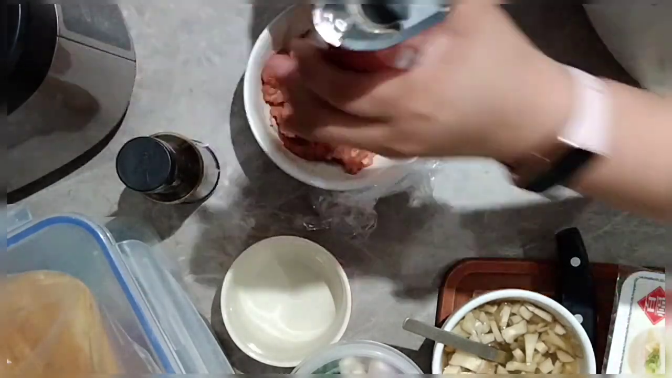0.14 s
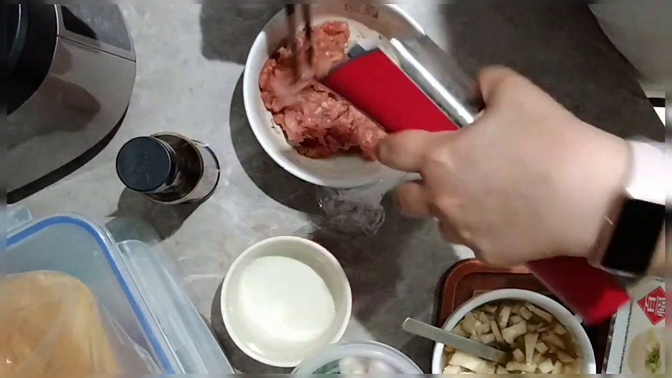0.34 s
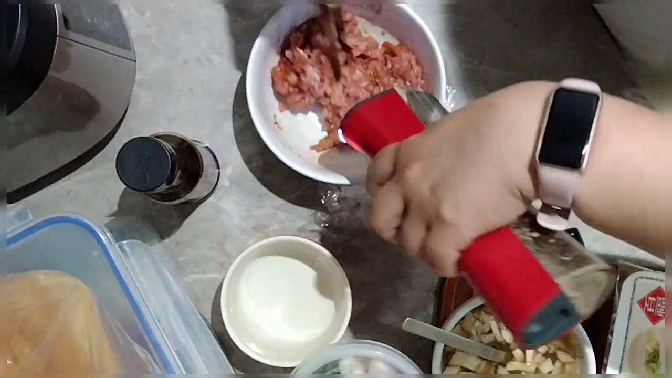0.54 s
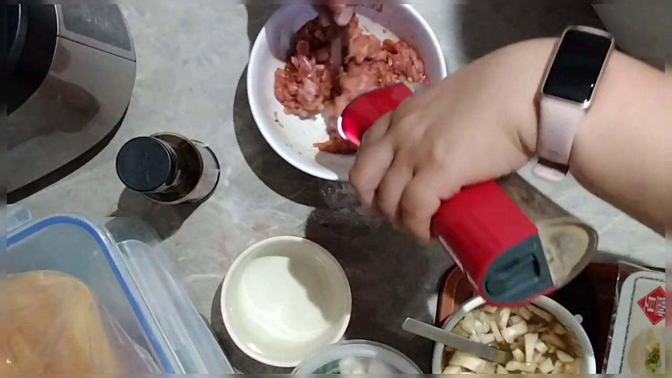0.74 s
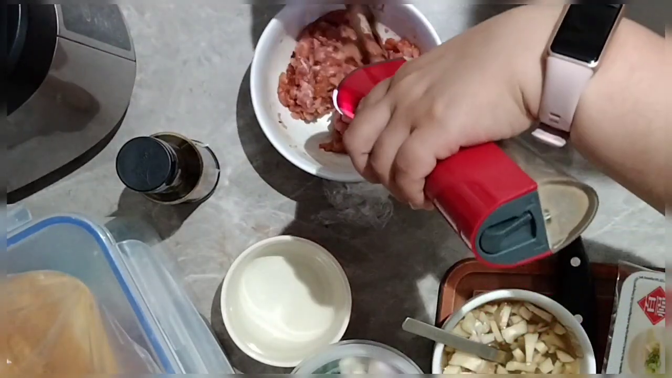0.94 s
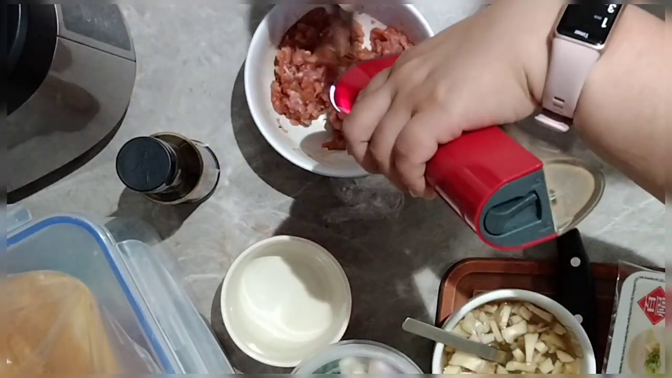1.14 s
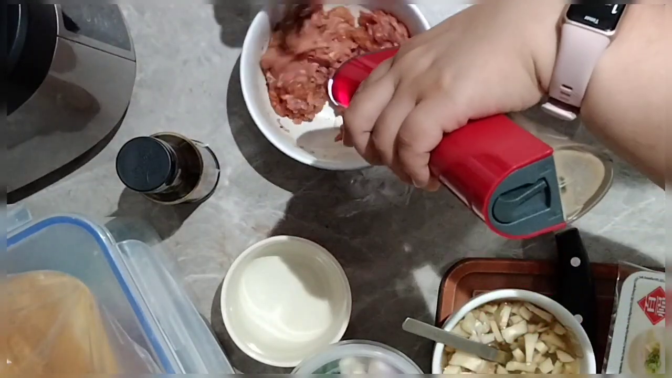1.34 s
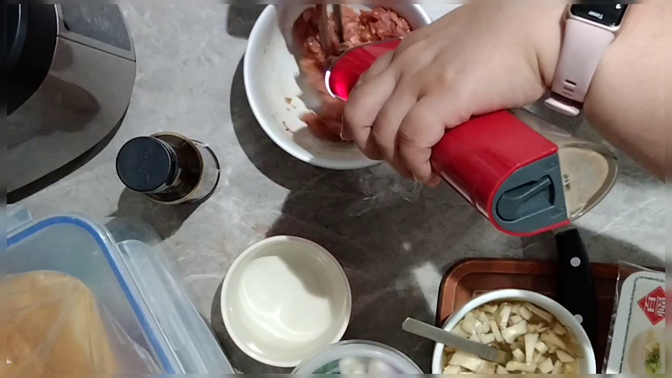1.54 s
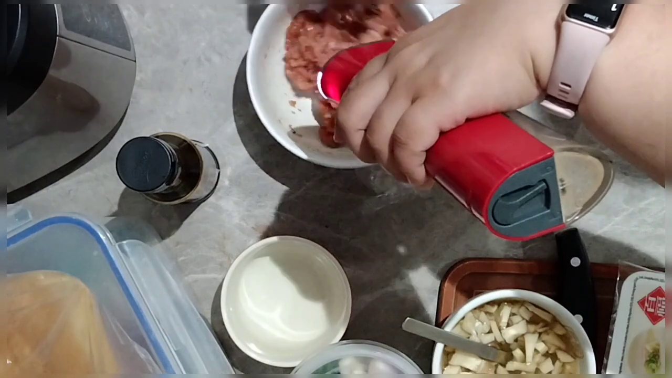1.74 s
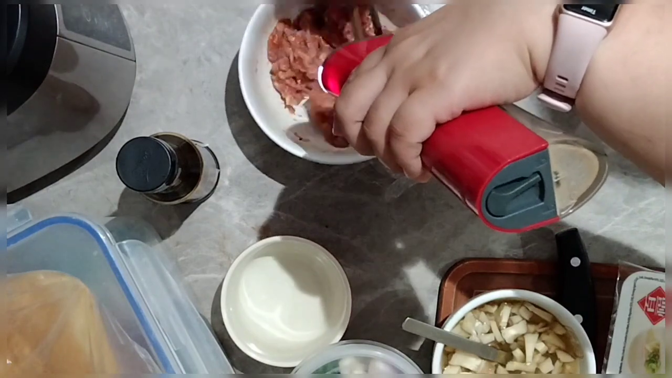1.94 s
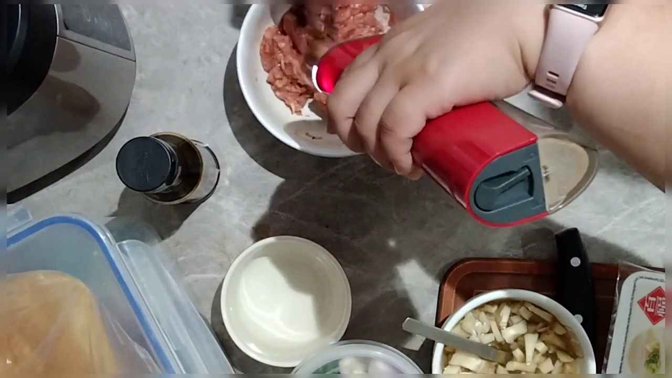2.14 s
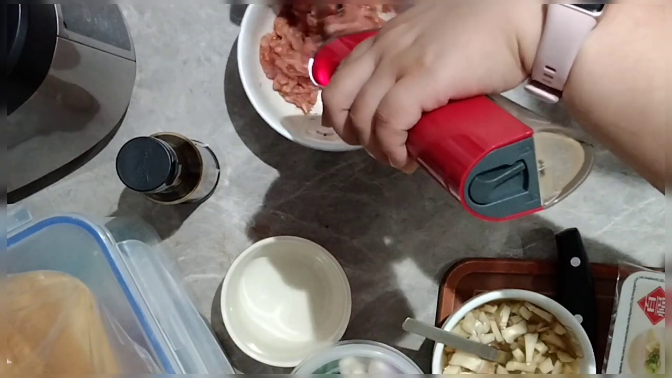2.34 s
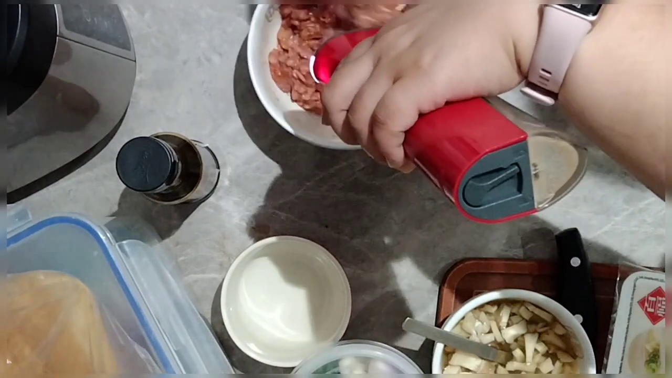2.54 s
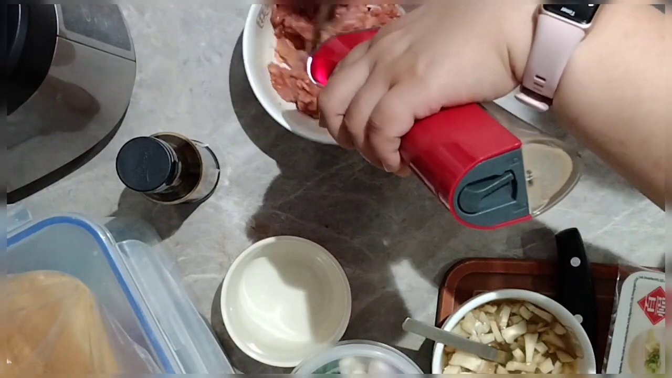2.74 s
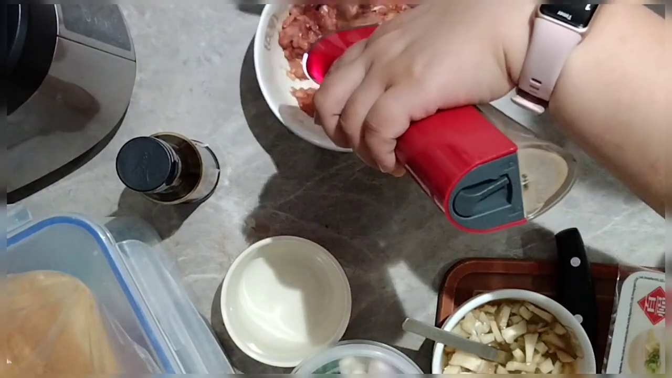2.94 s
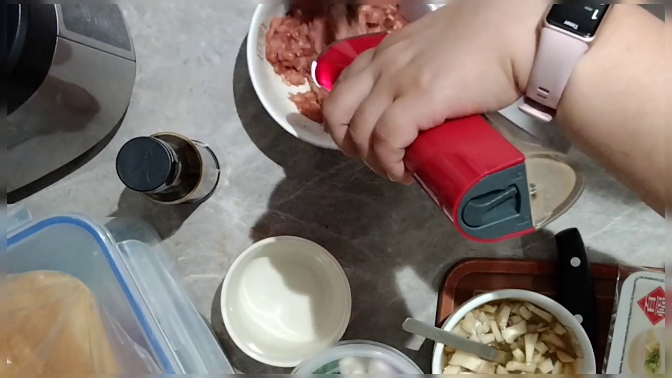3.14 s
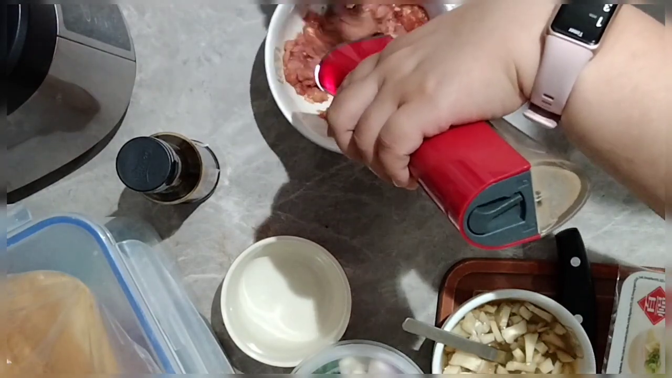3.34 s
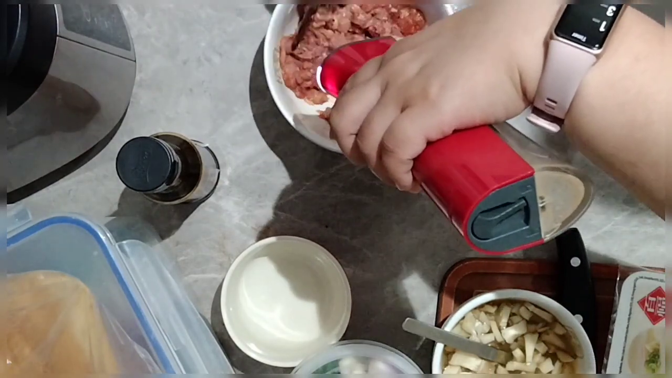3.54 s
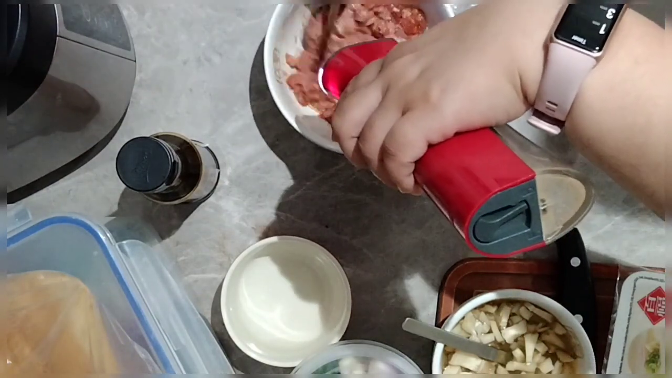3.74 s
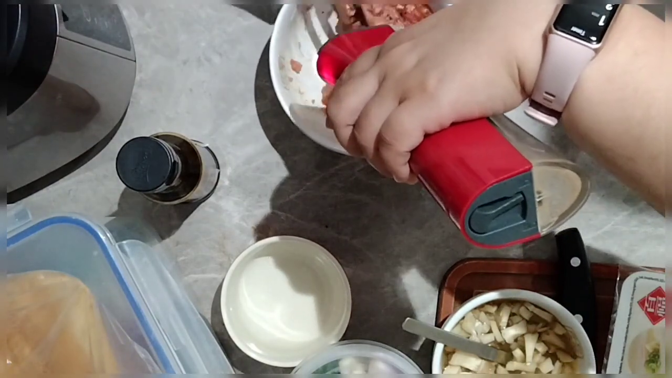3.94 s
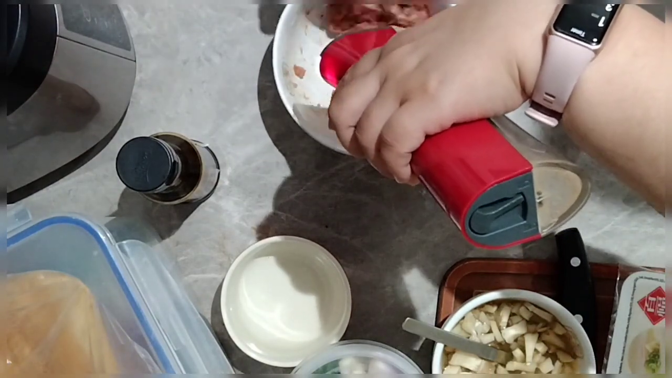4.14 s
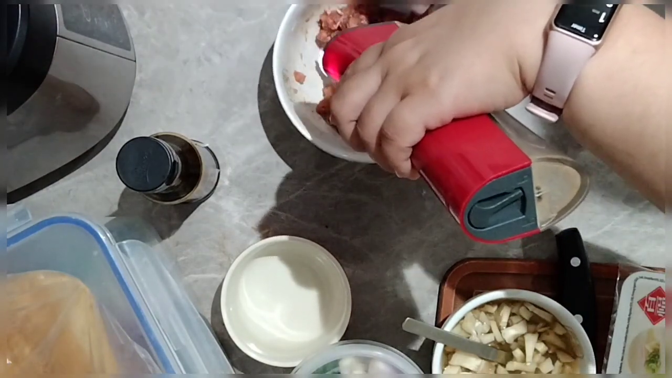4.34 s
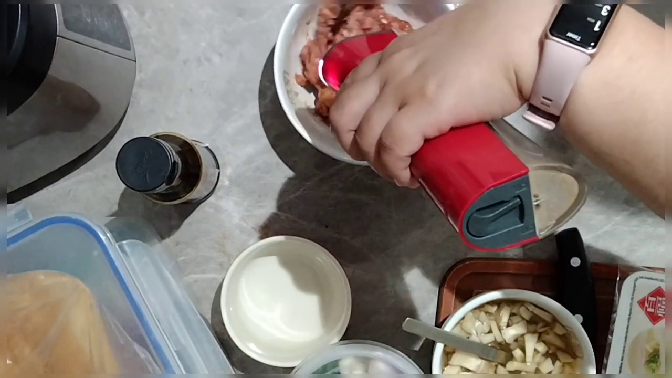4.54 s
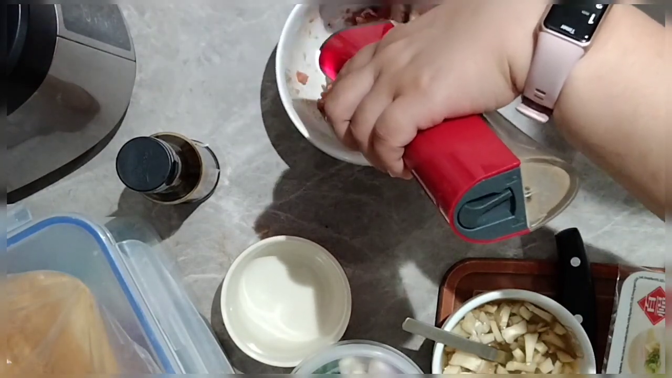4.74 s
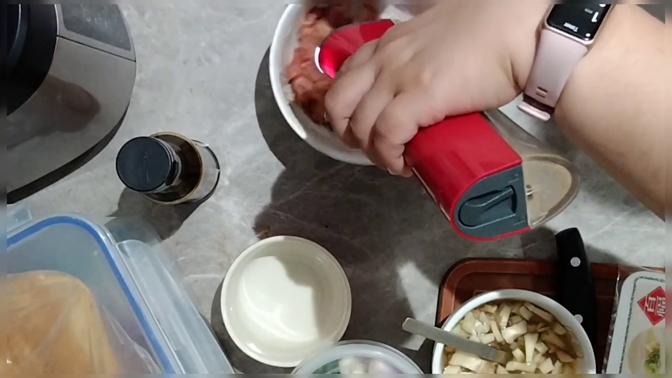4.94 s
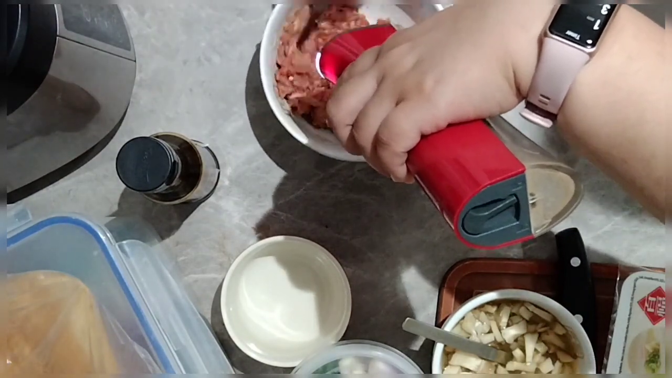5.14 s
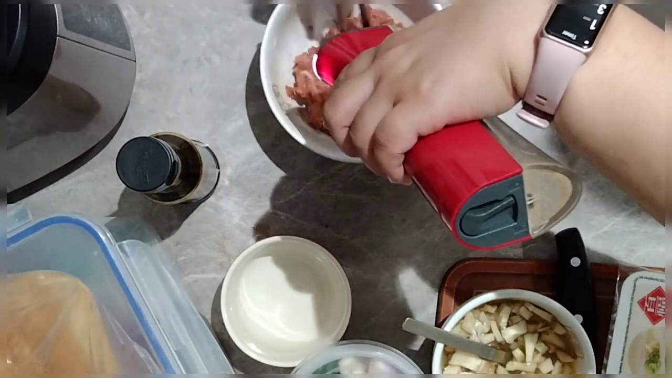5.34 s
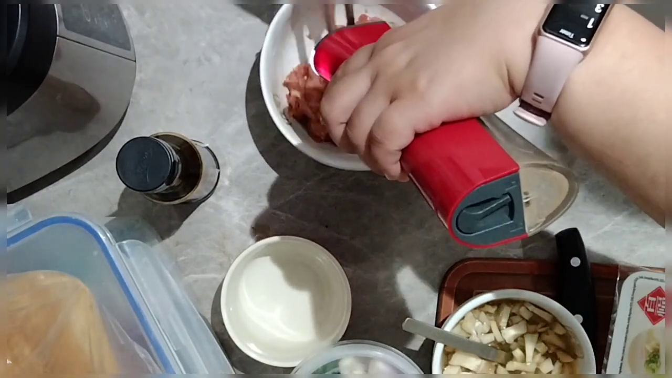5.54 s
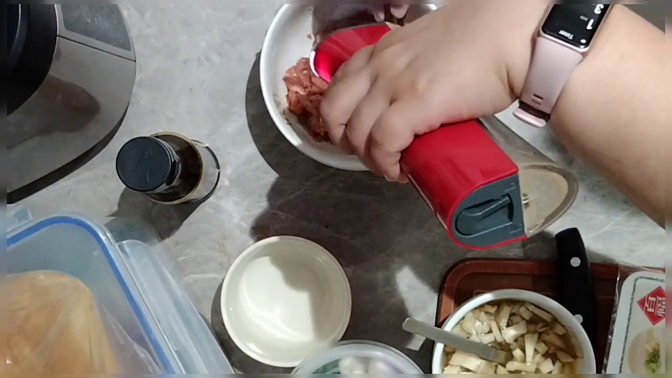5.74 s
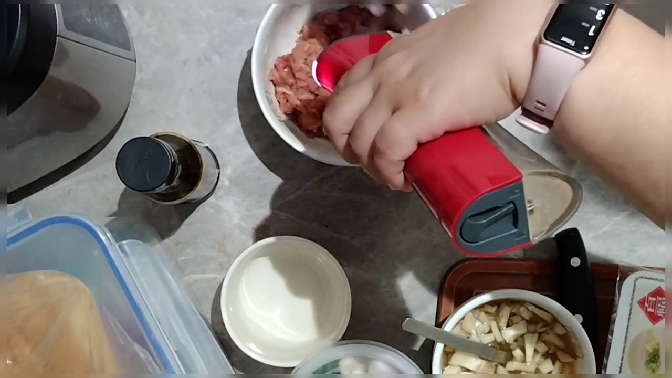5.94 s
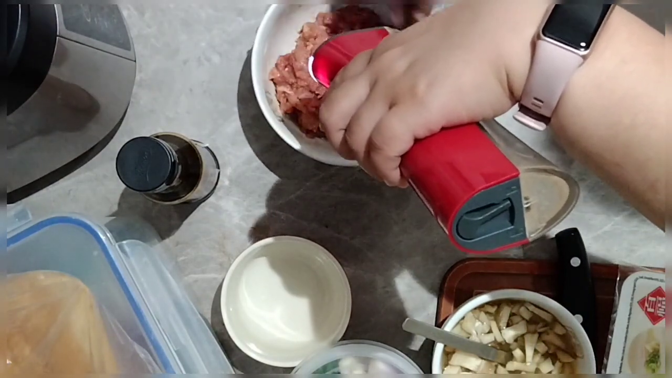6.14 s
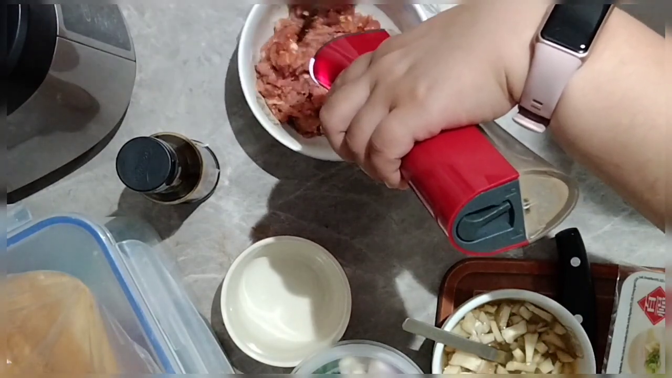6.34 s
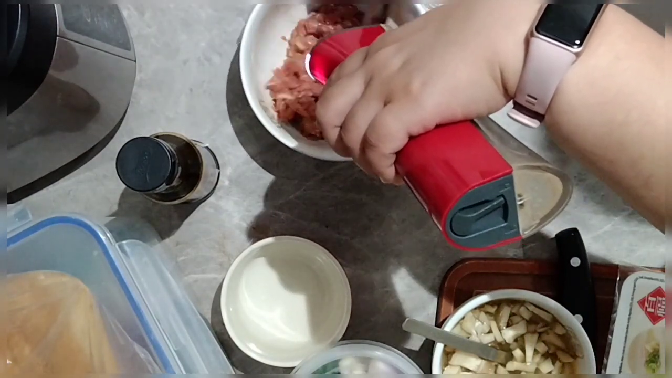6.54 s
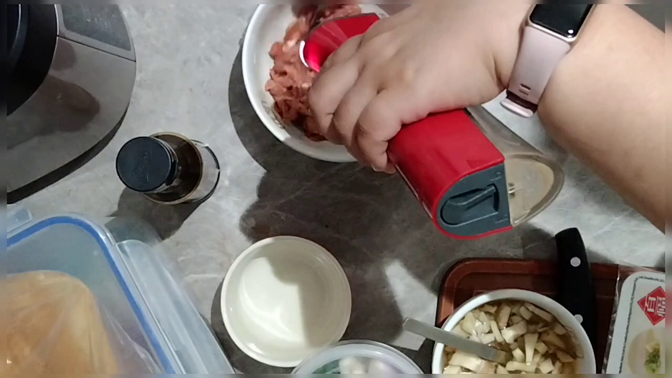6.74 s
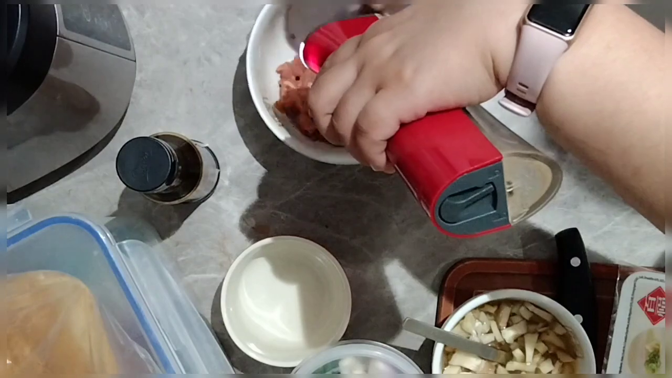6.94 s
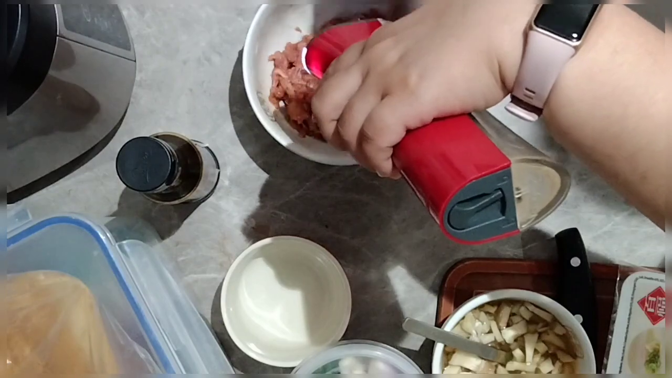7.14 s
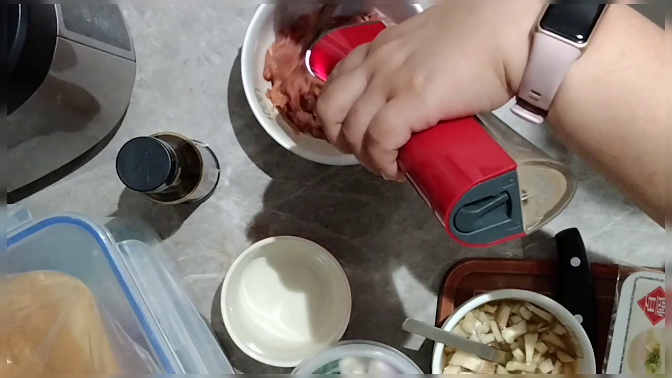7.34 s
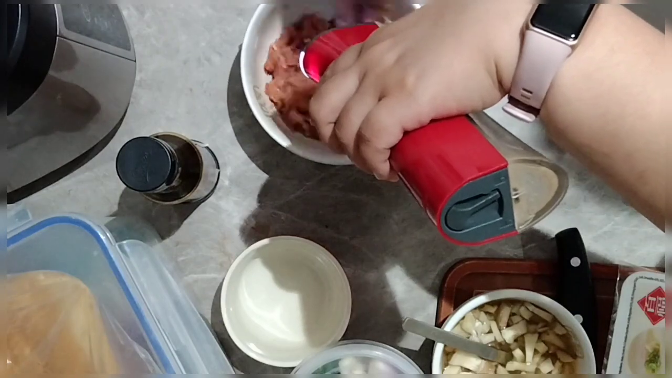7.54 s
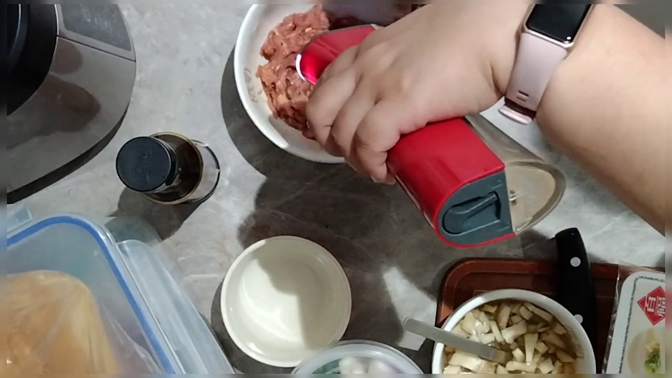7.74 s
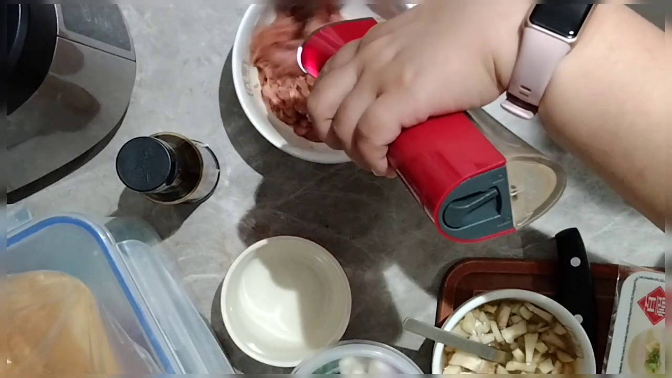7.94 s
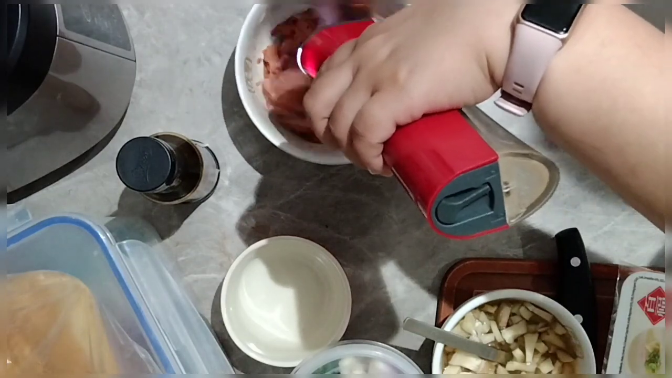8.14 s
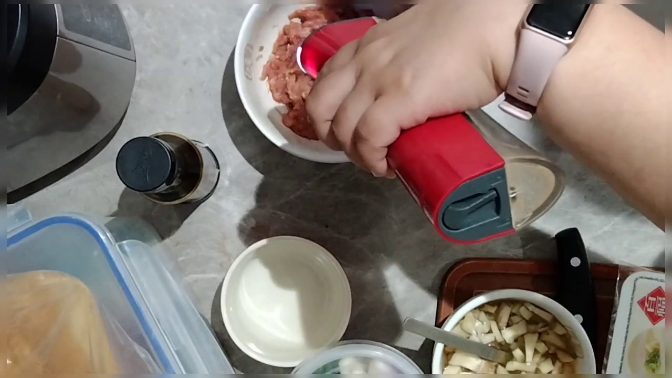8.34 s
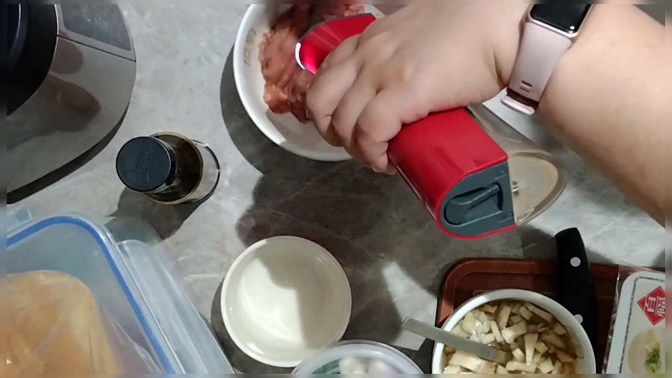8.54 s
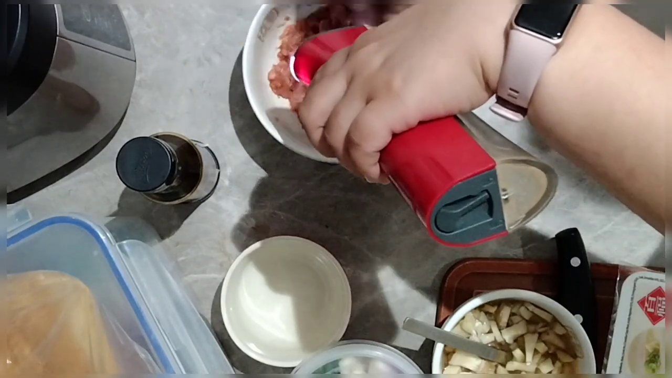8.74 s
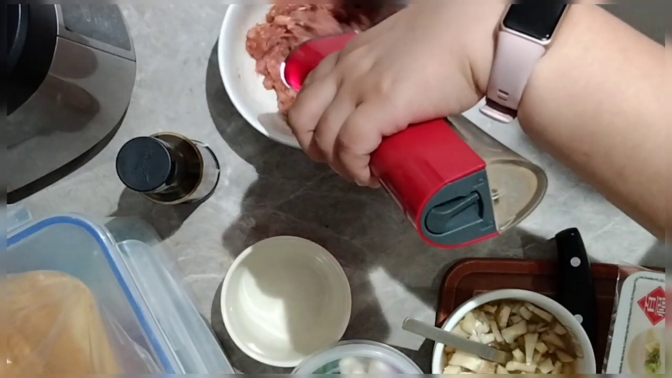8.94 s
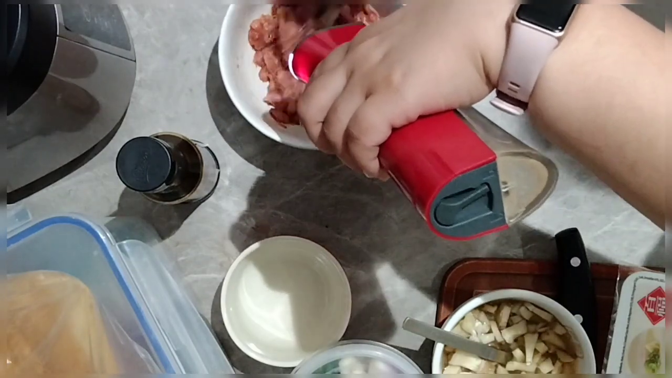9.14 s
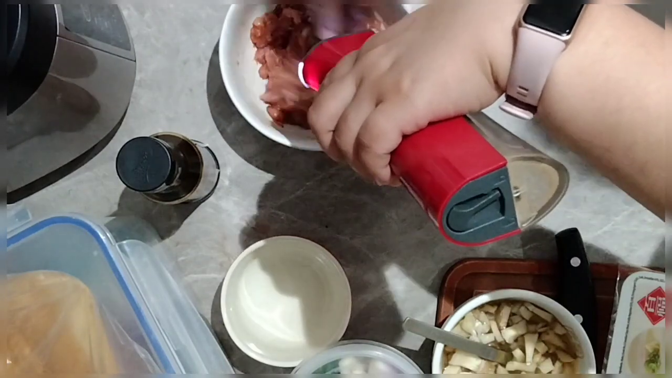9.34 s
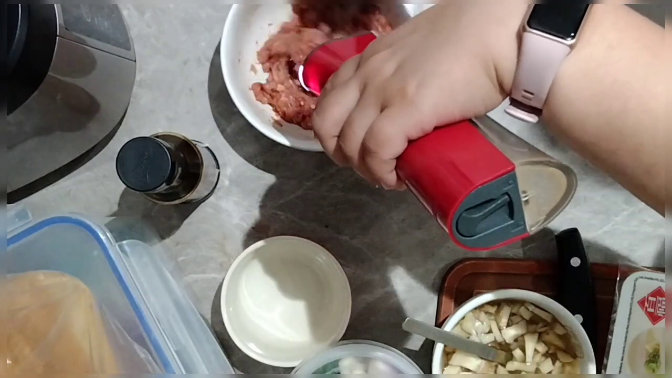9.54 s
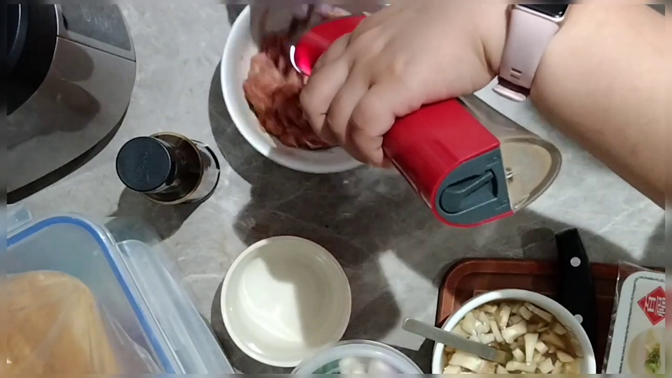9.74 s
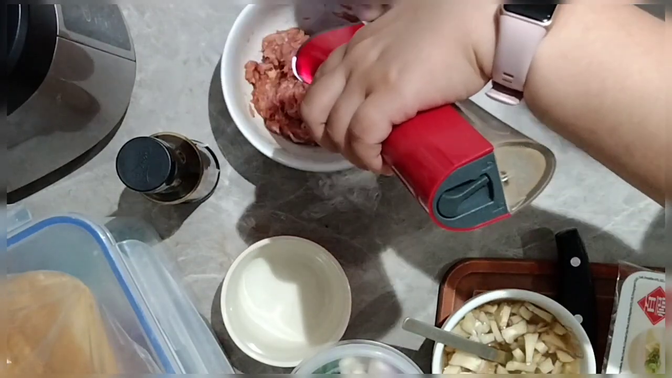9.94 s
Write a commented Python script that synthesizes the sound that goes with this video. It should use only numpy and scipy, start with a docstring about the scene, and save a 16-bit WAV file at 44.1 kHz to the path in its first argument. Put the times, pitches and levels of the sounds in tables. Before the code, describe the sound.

A close, centred kitchen sound with short reflections from the counter. At 0 seconds a faint plastic knock and tiny scuffs come as a pepper mill is handled; weak trickles lead to a bright, dry rush of peppercorns peaking near 0.4, with a duller landing. At about 0.6 the small motor spins up in a fraction of a second and runs to the cut-off near 10 seconds: a buzzy gear whine around 1 kHz, dense plastic rattle and fine, crisp crunching. From 1.2 to 2.1 hard corns catch repeatedly, dropping the pitch and making the teeth slap harshly. It then steadies, with milder dips around 3.7 to 4.3, 5.1, 5.8, 6.5 to 7.1, 7.8 to 8.2 and 9.2 to 9.7. The whine drifts slightly higher overall. Soft wet squelches and dull bowl rubs, clearest near 2.3 to 2.6 and 8.9, sit under the grinding, over very faint room noise and low hum.

```python
"""A battery pepper mill grinds over a bowl of minced meat in a small kitchen, after its peppercorns slide as it is tipped.
Its plastic gears whir as a tooth-mesh tone with shaft sidebands, and rattle as dense impacts in the resonant housing.
Hard corns load the burrs: the motor slows, the teeth slap and the crushed pepper, a stream of fine cracks, changes level.
Chopsticks stir the meat as bursts of resonant noise with soft knocks on the bowl; knocks ring the case as it is handled.
Behind them lie coloured room noise and the faint hum of an appliance."""
import sys
import numpy as np
from scipy import signal
from scipy.fft import rfft, irfft, next_fast_len
from scipy.io import wavfile
from scipy.ndimage import map_coordinates

SR = 44100
rng = np.random.default_rng(int(sys.argv[2]) if len(sys.argv) > 2 else 0)


def put_to_file(sound):
    """Save the sound as 16-bit audio at rate SR, in the file named by the first command-line argument."""
    columns = np.atleast_2d(sound).T  # one column per channel
    safe = np.clip(columns, -1, 1)
    whole_steps = np.round(safe * 32767)
    wavfile.write(sys.argv[1], SR, whole_steps.astype(np.int16))


N = 439677
START = 0.6076  # the motor starts [s]


def amp(db):
    """Level in decibels to amplitude ratio."""
    return 10 ** (np.asarray(db) / 20)


def unit(x):
    """Normalise the mean power: rms 1."""
    return x / np.sqrt(np.mean(np.abs(x) ** 2) + 1e-20)


def along(points, hz):
    """Interpolate (frequency, value) points on a logarithmic frequency axis."""
    f, v = np.transpose(points)
    return np.interp(np.log(hz + 1), np.log(f + 1), v)


def curve(rows):
    """Interpolate (time [s], value) rows linearly, one value per sample."""
    return np.interp(np.arange(N) / SR, *np.transpose(rows))


def wobble(rate):
    """Smooth random fluctuation: a spline through rate random knots per second."""
    knots = rng.standard_normal(12000)
    return map_coordinates(knots, [np.arange(N) * rate / SR], mode="wrap")


def filtered(x, response):
    """Linear filtering: the spectrum of x times a response of frequency."""
    m = next_fast_len(len(x) + SR // 4)
    spectrum = rfft(x, m) * response(np.fft.rfftfreq(m, 1 / SR))
    return irfft(spectrum, m)[:len(x)]


def coloured(x, spectrum):
    """Spectral shaping by (frequency [Hz], level [dB]) points, normalised to rms 1."""
    return unit(filtered(x, lambda f: amp(along(spectrum, f))))


def resonance(f, hz, width):
    """Complex response of one damped mode, peak 1."""
    return 1j * f * width / (hz * hz - f * f + 1j * f * width)


def grains(rate, spread_db):
    """Random impact train: rate impacts per second on average, of scattered size."""
    struck = rng.random(N) < rate / SR
    size = rng.standard_normal(N) * amp(spread_db * rng.standard_normal(N))
    return unit(struck * size)


def swell(centre, half):
    """Gaussian rise and fall around a moment, peak 1."""
    return np.exp(-((np.arange(N) / SR - centre) / half) ** 2)


def running(rise):
    """Linear fade-in over rise seconds from the motor start, 0 to 1."""
    return np.clip((np.arange(N) / SR - START) / rise, 0, 1)


def kitchen(x, wet_db, count=3):
    """Early reverberation: direct sound plus the short answer of counter and walls, changing as the hands move."""
    # reverberation time: (frequency [Hz], time to fall by 60 dB [s])
    decay_times = [(200, 0.31), (2000, 0.41), (12000, 0.21)]
    hz, t, z = signal.stft(rng.standard_normal((count, SR // 3)), SR, nperseg=256)
    decay = amp(-60 * t / along(decay_times, hz)[:, None])
    tails = signal.istft(z * decay, SR, nperseg=256)[1]
    late = np.pad(x, (SR // 300, 0))[:N]
    place = 2 * np.pi * (np.arange(N) / SR / 1.3 + rng.random())
    echo = np.zeros(N)
    for k, tail in enumerate(tails):
        weight = np.cos(place / 2 + np.pi * k / count) * np.sqrt(2 / count)
        echo += signal.oaconvolve(late * weight, tail / np.linalg.norm(tail))[:N]
    return (x + amp(wet_db) * echo) / np.hypot(1, amp(wet_db))


def load():
    """Load torque: each hard corn brakes the motor [Hz], makes the teeth slap [gain] and alters the crunch [dB]."""
    # hard corns in the burrs: (time of hardest bite [s], half-length [s], braking before the lag [Hz],
    # tooth slap [dB], change of the crunch [dB])
    corns = [(1.229, .035, 149.6, -29.5, 1), (1.379, .085, 220, -30.5, 2.5),
             (1.519, 0.058, 129.8, -34.5, -2.5), (1.609, 0.046, 130, -28, 1.5),
             (1.719, 0.056, 150.4, -30, 0.5), (1.97, 0.037, 150.2, -30, 6), (2.04, .06, 165.4, -34.5, 0.5),
             (3.681, 0.16, 75, -43, 0.5), (4.081, 0.059, 29.8, -36, -0.5), (4.28, .12, 159.5, -34, 1.5),
             (5.098, 0.19, 69.9, -40.5, .3), (5.78, 0.068, 50, -37.5, 1.5), (6.469, 0.097, 50, -42, 0.5),
             (6.939, .06, 95, -31.5, 1), (7.069, 0.097, 90, -37, -0.5), (7.8, .1, 80, -36.5, 1),
             (8.24, 0.15, 190, -39.5, 2), (9.16, 0.081, 115, -37, 1), (9.36, 0.093, 49.97, -45, 0),
             (9.56, 0.071, 40.03, -36, .3), (9.72, .06, 60, -34, -0.5)]
    inertia_s = .035  # the speed lags behind the load
    slap_idle_db = -44  # tooth slap between hard corns
    jolt_db, jolt_s = -36, .05  # the teeth slap once as they take up their play, this long after the start
    brake, crunch_db = np.zeros(N), np.zeros(N)
    slap_power = amp(slap_idle_db) ** 2 + amp(jolt_db) ** 2 * swell(START + jolt_s, jolt_s / 2)
    for s, half, slowing, slap_db, extra_db in corns:
        bite = swell(s, half)
        brake += slowing * bite
        slap_power += (amp(slap_db) * bite) ** 2
        crunch_db += extra_db * bite
    keep = np.exp(-1 / (inertia_s * SR))
    slowing = signal.lfilter([1 - keep], [1, -keep], brake)
    return slowing, np.sqrt(slap_power), crunch_db


def motor(slowing):
    """Rotational inertia: the tooth-mesh rate [Hz] spins up exponentially to the free speed less the slowing."""
    # speed with only fine pepper in the burrs: (time [s], tooth-mesh rate [Hz])
    free_speed = [(.8, 923.4), (3, 942), (4.7, 999.5), (5.6, 953.6), (6.25, 1035), (8, 995.4), (9.97, 1022)]
    spin_up_s, spin_up_hz = .06, 400.3  # the motor starts this far below its speed and catches up
    since = np.maximum(np.arange(N) / SR - START, 0)
    return curve(free_speed) - spin_up_hz * np.exp(-since / spin_up_s) - slowing


def gear_tone(phase, rough, flutter_rate):
    """Random modulation of one partial: uneven teeth shake its strength and timing."""
    flutter = 1 + rough * (wobble(flutter_rate) + 1j * wobble(flutter_rate))
    return unit(np.real(flutter * np.exp(1j * phase)))


def gears(phase, slowing, slap_gain, count=16):
    """Gear-mesh modulation: a mesh tone with sidebands from a pinion of count teeth; overtones slap under load."""
    # mesh tone before radiation, while no hard corn is caught: (time [s], level [dB])
    whir_level = [(.8, -50.5), (2.4, -45.5), (3, -55), (4.1, -44.5), (4.9, -44), (5.9, -52.5), (6.8, -41.5),
                  (8, -46), (9.97, -44)]
    # how well the mesh tone escapes the housing: (frequency [Hz], gain [dB])
    radiation = [(650, -33), (780, -6.5), (830, -4.5), (970, 0), (1050, -5), (1150, -35)]
    # how well the case passes the slap of the teeth: (frequency [Hz], relative gain [dB])
    slap_colour = [(1000, 10), (1550, -8.5), (1800, -1), (2050, 1), (2420, 2), (2700, 2), (2950, -1),
                   (3250, -5.5), (3700, -11.5), (5000, -31)]
    loss_db_per_hz = 0.01  # the mesh tone fades as the gears slow
    shaft = phase / count
    whir = gear_tone(phase, rough=.6, flutter_rate=80)
    whir += amp(-3.5) * gear_tone(phase - shaft, rough=1.1, flutter_rate=110)
    whir += amp(-9.5) * gear_tone(phase + shaft, rough=0.59, flutter_rate=110)
    whir = unit(whir) * amp(curve(whir_level) - loss_db_per_hz * slowing)
    # the small housing radiates almost nothing below its first resonance
    whir = filtered(whir, lambda f: amp(along(radiation, f)))
    slap = sum(gear_tone(k * phase, rough=1.8, flutter_rate=240) for k in range(2, 6))
    catching = amp(2 * np.sin(shaft / 3) + 2 * wobble(55))
    slap = coloured(slap * catching, slap_colour) * slap_gain
    return kitchen((whir + slap) * running(rise=0.05), wet_db=-5.5)


def shell(x):
    """Modal resonance: x through the sharp modes of the housing in cascade."""
    # sharp modes: (frequency [Hz], width [Hz], gain of the mode alone over the broad colour [dB])
    modes = [(1776, 18, 4), (1831, 45, 3), (2132, 27, 3), (2396, 22, 8), (2480, 35, 4), (2649, 18, 7),
             (2785, 18, 10), (2835, 27, 6), (2969, 30, 5), (3093, 27, 4), (3227, 40, 4)]

    def response(f):
        """Product of the peaks that each mode raises."""
        gain = 1
        for hz, width, db in modes:
            gain = gain * (1 + (amp(db) - 1) * resonance(f, hz, width))
        return gain
    return filtered(x, response)


def rattle(phase, slowing, slap_gain):
    """Impact excitation: loose plastic gears tick densely on the housing, surging with each turn of the slow wheels."""
    # broad colour of the housing: (frequency [Hz], relative density [dB per Hz])
    housing = [(450, -57), (770, -31), (835, -10.5), (970, -10), (1100, -8.5), (1650, -4.5), (1820, -2.5),
               (2150, -3), (2850, -1), (3250, -4.5), (3700, -8.5), (4300, -22.5), (6000, -19), (15000, -47)]
    # base level, which eases when the burrs run nearly empty: (time [s], level [dB])
    rattle_level = [(.7, -34.5), (1.7, -34.5), (2.2, -34.5), (3.4, -34.5), (4.2, -33.5), (5.2, -34),
                    (5.45, -35), (5.78, -33.5), (5.98, -36.5), (6.25, -34), (7.3, -34), (7.6, -33.5),
                    (8.3, -34), (8.55, -35), (8.85, -34), (9.97, -34)]
    growth_db_per_hz = 0.0052  # the base level grows as a corn slows the gears
    surge = amp(.7 * np.sin(phase / 52) + .5 * np.sin(phase / 108) + .8 * wobble(60))
    ticks = grains(rate=11000, spread_db=1.2) * (1 + np.cos(phase) / 2)
    ticks = shell(kitchen(ticks * surge, wet_db=-4.5))
    level = amp(curve(rattle_level) + growth_db_per_hz * slowing)
    # as the teeth slap harder they carry a greater share of the sound
    share = 1 / np.hypot(1, slap_gain / (amp(8.5) * level))
    return coloured(ticks, housing) * level * share * running(rise=0.036)


def burrs(phase, extra_db):
    """Brittle fracture: peppercorns crumble between the burrs in fine cracks, pulsing with the slow wheels."""
    # colour of crushed pepper: (frequency [Hz], relative density [dB per Hz])
    crunch = [(800, -68), (2500, 4.5), (4200, -1), (5400, -4), (5900, 0.5), (6600, -2.5), (7800, -.5),
              (8800, -9), (11300, -10.5), (13000, -16), (15600, -16.5)]
    # crumbling between hard corns: (time [s], level [dB])
    crumbling = [(.7, -44), (2.1, -45), (2.5, -43), (3.6, -43), (4.1, -44), (9.97, -44.5)]
    bite = amp(.3 * np.sin(phase / 52) + .35 * np.sin(phase / 108) + .3 * wobble(25))
    cracks = kitchen(grains(rate=18000, spread_db=1.5) * bite, wet_db=-4)
    return coloured(cracks, crunch) * amp(curve(crumbling) + extra_db) * running(rise=0.096)


def groan(slowing):
    """Noise-driven resonance: strained by a hard corn, the housing also rings at its low mode."""
    mode_hz, width_hz = 758, 110
    level_db, at_hz = -66, 156  # level of the ring at this slowing
    ring = filtered(rng.standard_normal(N), lambda f: resonance(f, mode_hz, width_hz) ** 2)
    return unit(ring) * amp(level_db) * slowing / at_hz


def peppercorns():
    """Granular flow: corns slide down the chamber in rushes of impacts as the mill is tipped, then land duller."""
    # colour of the slide: (frequency [Hz], relative density [dB per Hz])
    slide_colour = [(900, -54), (1500, -38), (1900, -36), (2450, -17), (2750, -4), (3250, -1.5),
                    (3900, -15), (5000, -12.5), (6200, -12.5), (8000, -15), (10000, -24), (15500, -30)]
    # rushes: (time of the peak [s], level [dB], rise half-length [s], fall time constant [s])
    rushes = [(.18, -64, .01, 0.038), (.29, -61, 0.016, .06), (.42, -36, 0.034, 0.036),
              (.56, -53.5, .04, 0.088)]
    # the corns pile up on the burrs
    landing_s, half_s, landing_hz, landing_db = 0.435, 0.02, 2150, -53
    t = np.arange(N) / SR
    flow = np.zeros(N)
    for s, db, rise, fall in rushes:
        flow += amp(db) * np.where(t < s, swell(s, rise), np.exp(-np.abs(t - s) / fall))
    slide = coloured(grains(rate=14000, spread_db=2.5), slide_colour) * flow
    patter = grains(rate=3000, spread_db=3.0)
    patter = unit(filtered(patter, lambda f: resonance(f, landing_hz, 0.4 * landing_hz) ** 2))
    landing = patter * amp(landing_db) * swell(landing_s, half_s)
    return kitchen(slide + landing, wet_db=-3)


def stirring():
    """Cavity resonance: each stroke squelches a hollow that deepens in pitch as it opens, and rubs the damped bowl."""
    # chopstick strokes: (time [s], hold [s], squelch level before the envelope [dB], starting hollow pitch [Hz])
    strokes = [(.763, .015, -62, 710), (0.99, 0.017, -51, 375), (1.897, .025, -61, 636),
               (2.002, 0.04, -54.5, 580), (2.263, .03, -53, 611), (2.304, 0.048, -48.5, 590),
               (2.507, .045, -48.5, 540), (2.574, .03, -49.5, 559.7), (3.335, .06, -53, 569),
               (4.271, .04, -70, 690), (4.855, 0.021, -68, 403.8), (5.324, .03, -64, 571),
               (5.626, 0.021, -64, 419), (6.351, .02, -64, 212.1), (6.417, .04, -60, 465),
               (8.034, .02, -53.5, 696), (8.851, .04, -58.5, 350), (8.878, 0.062, -49.5, 615),
               (9.734, 0.039, -50.5, 550)]
    # bowl modes, each applied twice: (frequency [Hz], width of one pass [Hz], relative level [dB])
    bowl_modes = [(473, 150, -21), (647, 150, -7), (1226, 279, 0.5)]
    attack_s, t60_s = 0.0023, 0.1  # each stroke presses in, holds and dies away
    hollow_width, rub_db = 0.41, 6.5  # width of the hollow over its pitch; rub on the bowl over the squelch
    out, t = np.zeros(N + SR), np.arange(SR // 3) / SR
    bowl = lambda f: sum(amp(level) * resonance(f, mode, width) ** 2 for mode, width, level in bowl_modes)
    for s, length, db, hz in strokes:
        push = (1 - np.exp(-t / attack_s)) * amp(-60 * np.maximum(t - length, 0) / t60_s)
        rub = unit(filtered(rng.standard_normal(len(t)), bowl))
        squelch = filtered(rng.standard_normal(len(t)), lambda f: resonance(f, hz, hollow_width * hz) ** 2)
        # reading ever more slowly lowers the pitch
        squelch = unit(np.interp(t - 0.75 * t ** 2, t, squelch))
        out[round(s * SR):][:len(t)] += amp(db) * push * (squelch + amp(rub_db) * rub)
    return kitchen(out[:N], wet_db=-3.5)


def handling():
    """Modal ringing: the plastic case rings briefly at each scuffing knock."""
    # knocks as the mill is lifted, tipped and switched on: (time [s], level [dB])
    knocks = [(.001, -56), (0.044, -67), (.078, -74.5), (.128, -72), (.165, -90), (.37, -85), (.612, -79)]
    # case modes, each applied twice: (frequency [Hz], width of one pass [Hz], relative level [dB])
    case_modes = [(540, 110, -10), (1353, 170, 6), (1720, 220, -8), (2700, 150, -6), (3500, 110, 0),
                  (6200, 400, -18.5)]
    out, t = np.zeros(N + SR), np.arange(SR // 3) / SR
    case = lambda f: sum(amp(level) * resonance(f, hz, width) ** 2 for hz, width, level in case_modes)
    for s, db in knocks:
        scuff = rng.standard_normal(len(t)) * amp(-60 * t / 0.021)
        out[round(s * SR):][:len(t)] += amp(db) * unit(filtered(scuff, case))
    return kitchen(out[:N], wet_db=-2)


def background():
    """Stationary noise and a periodic source: quiet room air and the hum of an appliance motor."""
    # colour of the room noise: (frequency [Hz], relative density [dB per Hz])
    air = [(25, -17), (50, -12), (72, 2), (90, 1), (120, -8), (200, -9.5), (260, -14.5), (500, -14.5),
           (1500, -17), (4000, -20), (15000, -21.5)]
    hum = gear_tone(2 * np.pi * 97 * np.arange(N) / SR, rough=0.14, flutter_rate=6)
    return amp(-74) * hum + amp(-69.5) * coloured(rng.standard_normal(N), air)


def scene():
    """Superposition: one load and one gear phase couple the grinding sounds; both channels are alike."""
    slowing, slap_gain, crunch_db = load()
    mesh_hz = motor(slowing) * (1 + .008 * wobble(25))
    phase = 2 * np.pi * np.cumsum(mesh_hz) / SR
    mill = gears(phase, slowing, slap_gain) + rattle(phase, slowing, slap_gain)
    mill += burrs(phase, crunch_db) + groan(slowing)
    mono = mill + peppercorns() + stirring() + handling() + background()
    return np.array([mono, mono])


def record(dry):
    """Band limiting: the recorder keeps nothing from 15600 Hz upward."""
    return np.array([filtered(channel, lambda f: f < 15600) for channel in dry])


dry = scene()
out = record(dry)
put_to_file(out)
```